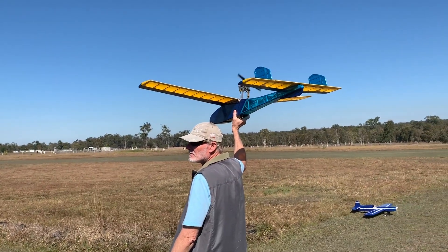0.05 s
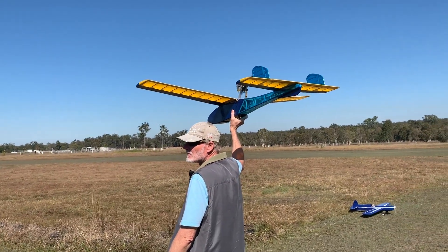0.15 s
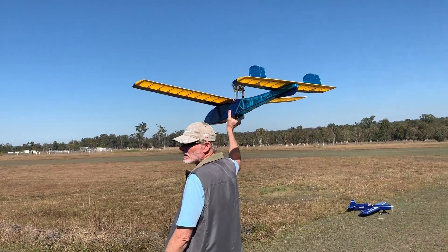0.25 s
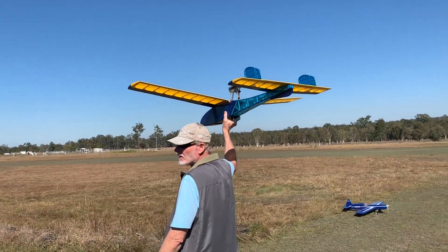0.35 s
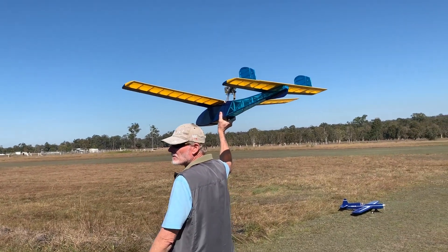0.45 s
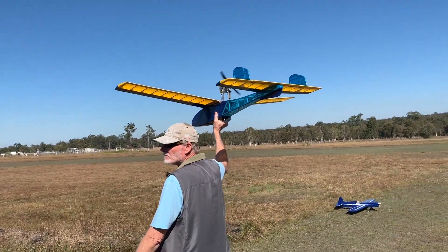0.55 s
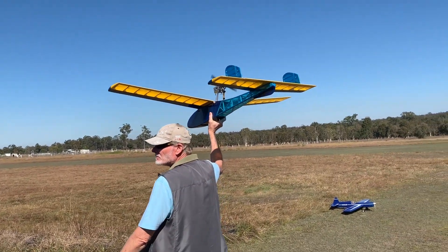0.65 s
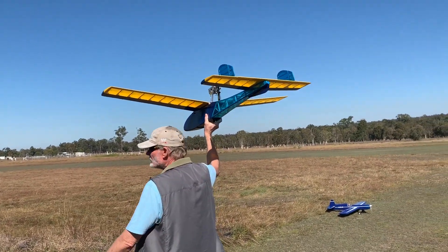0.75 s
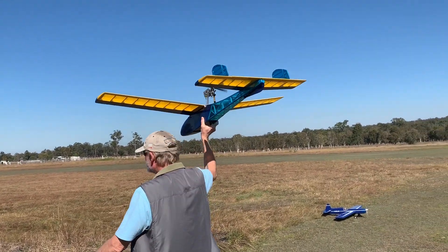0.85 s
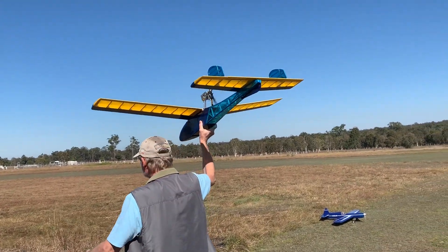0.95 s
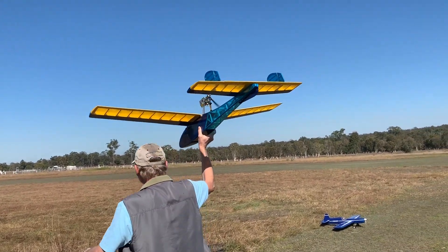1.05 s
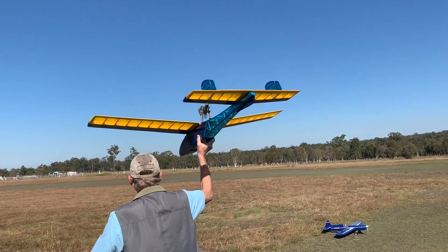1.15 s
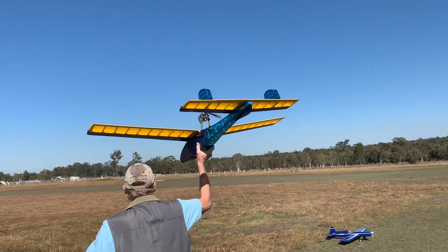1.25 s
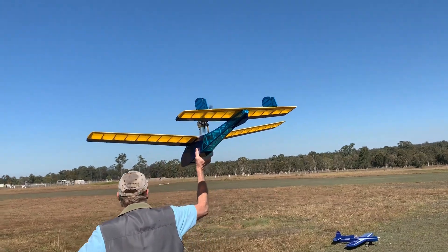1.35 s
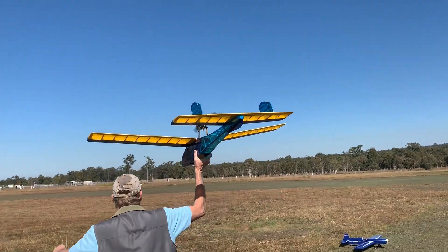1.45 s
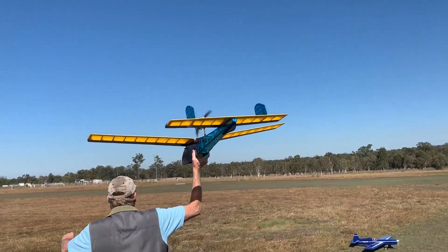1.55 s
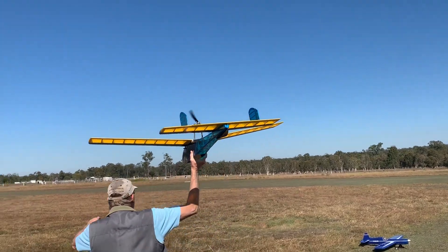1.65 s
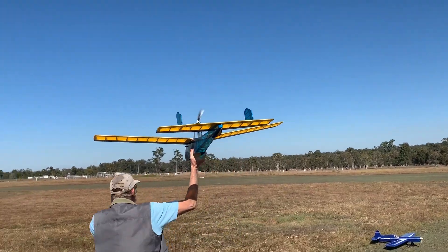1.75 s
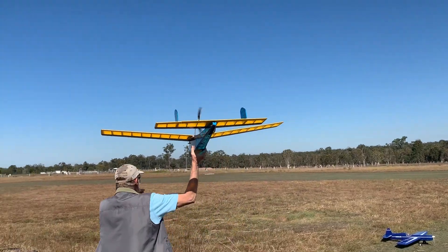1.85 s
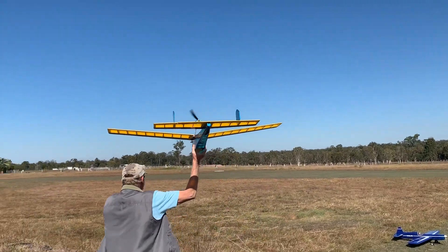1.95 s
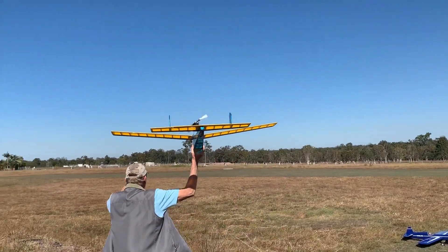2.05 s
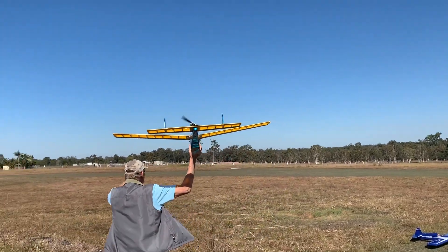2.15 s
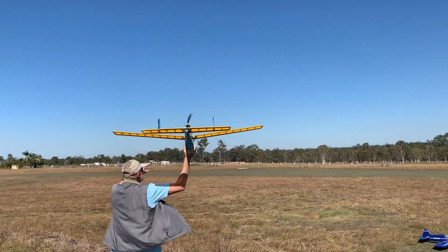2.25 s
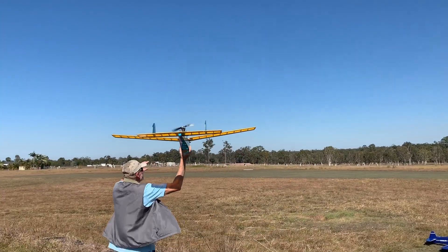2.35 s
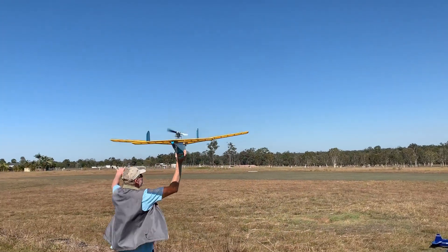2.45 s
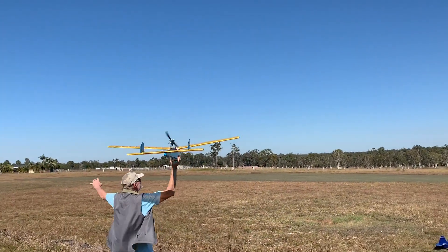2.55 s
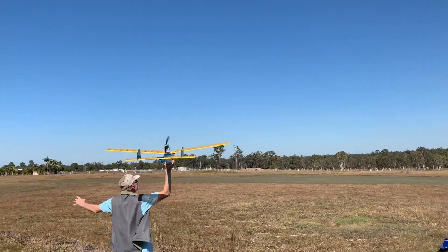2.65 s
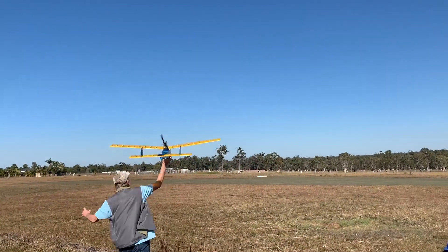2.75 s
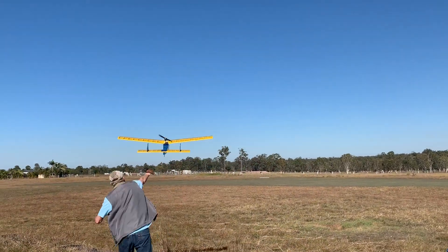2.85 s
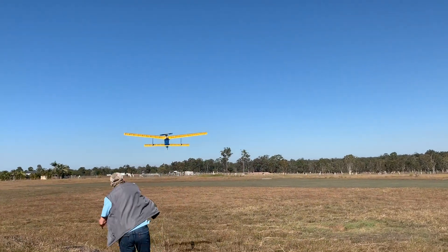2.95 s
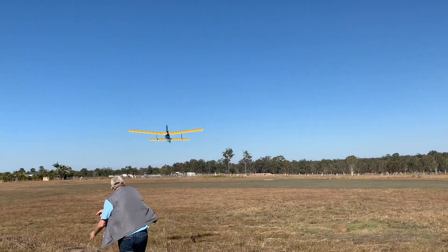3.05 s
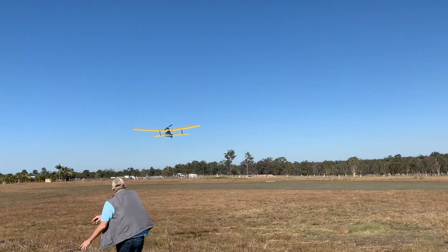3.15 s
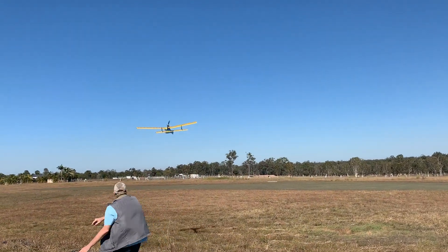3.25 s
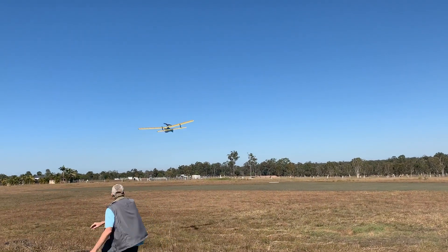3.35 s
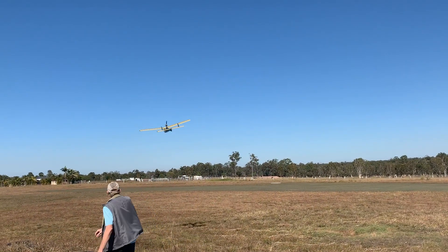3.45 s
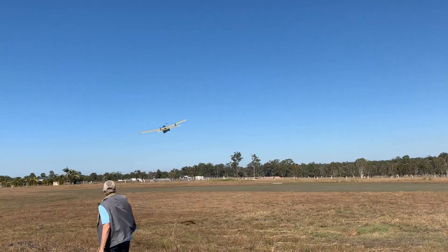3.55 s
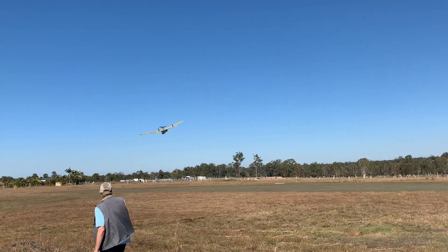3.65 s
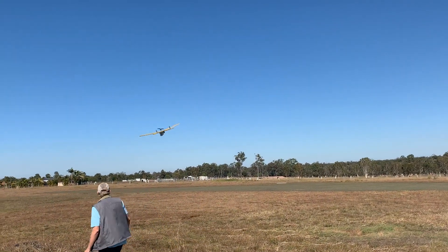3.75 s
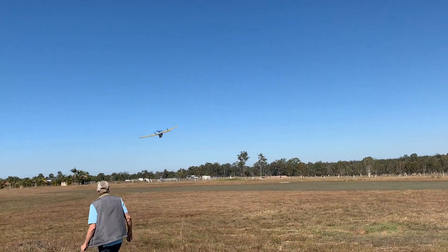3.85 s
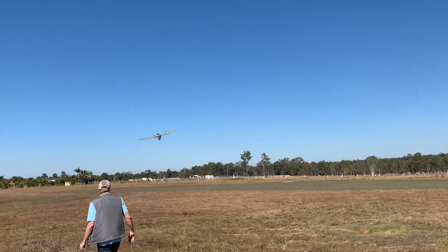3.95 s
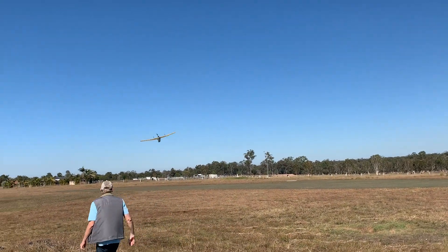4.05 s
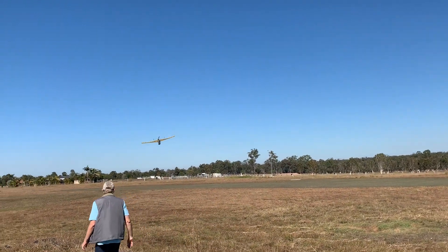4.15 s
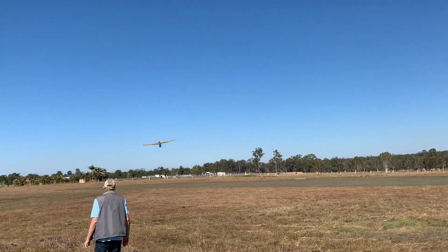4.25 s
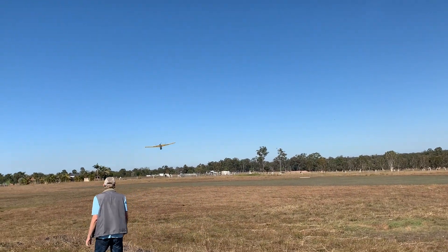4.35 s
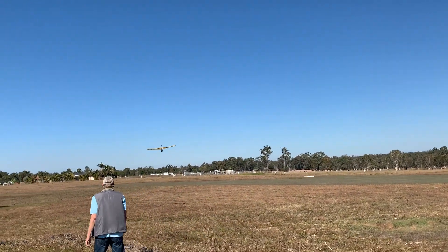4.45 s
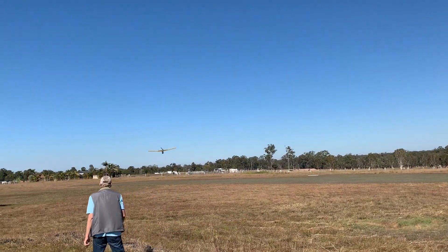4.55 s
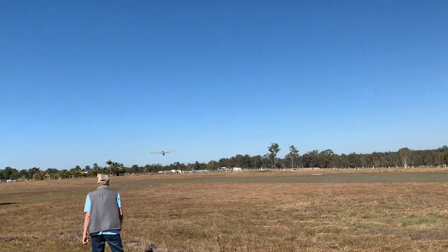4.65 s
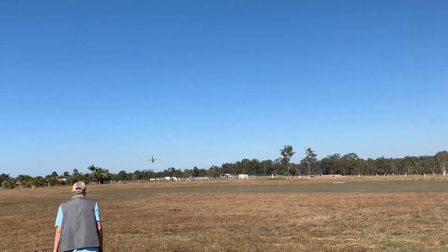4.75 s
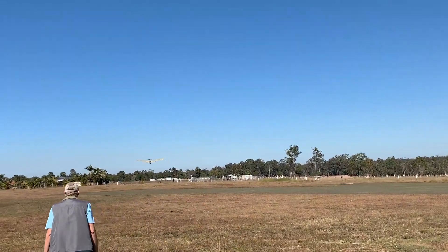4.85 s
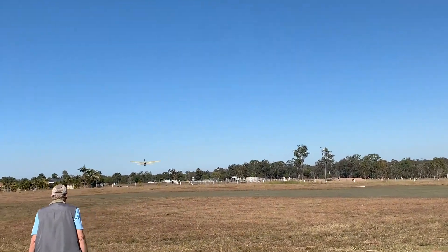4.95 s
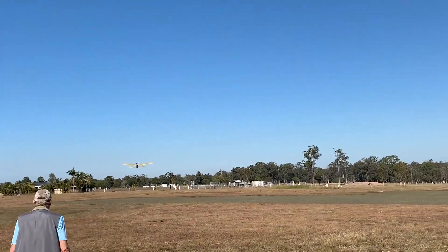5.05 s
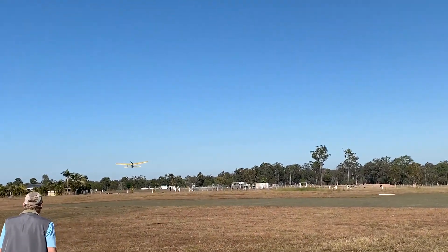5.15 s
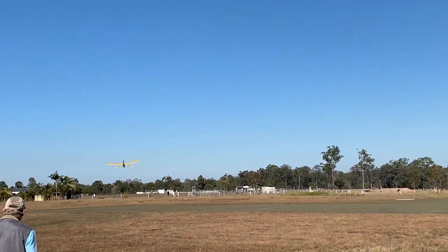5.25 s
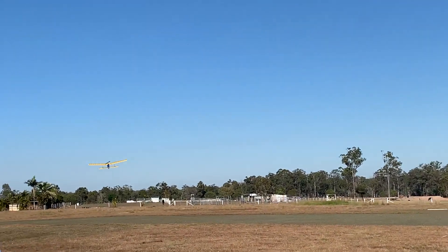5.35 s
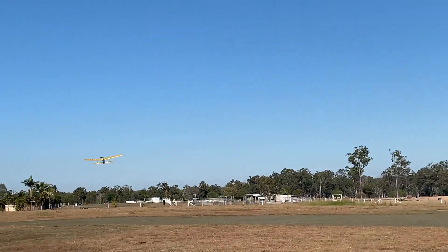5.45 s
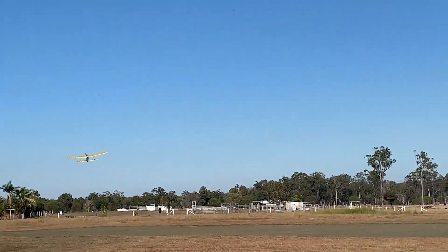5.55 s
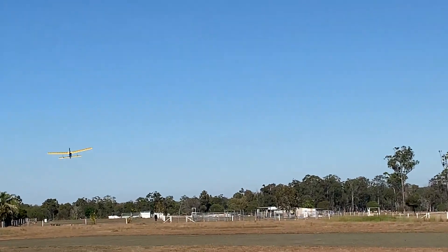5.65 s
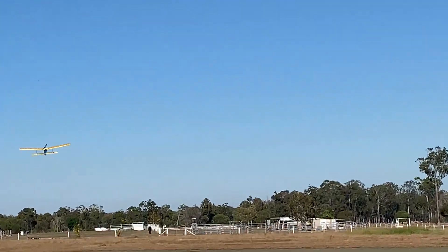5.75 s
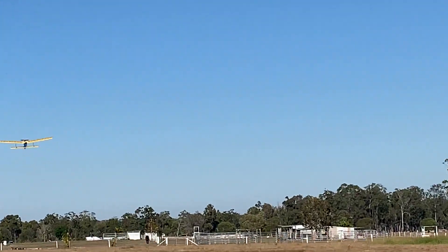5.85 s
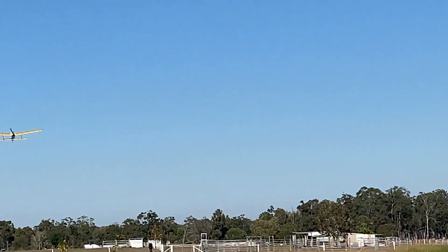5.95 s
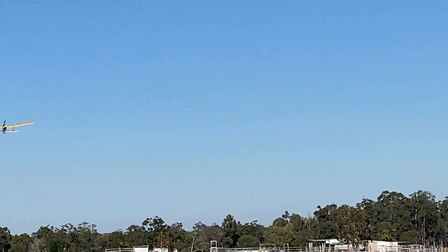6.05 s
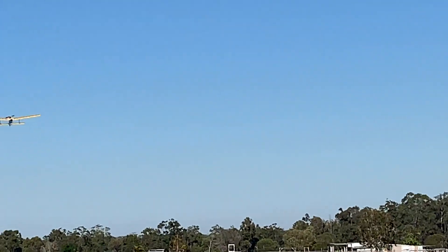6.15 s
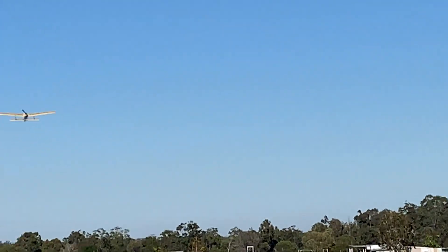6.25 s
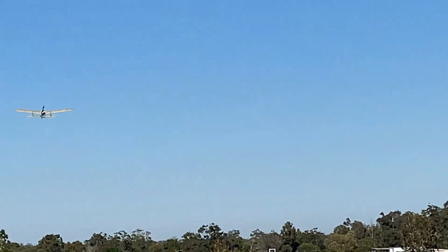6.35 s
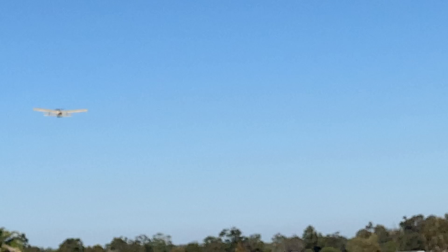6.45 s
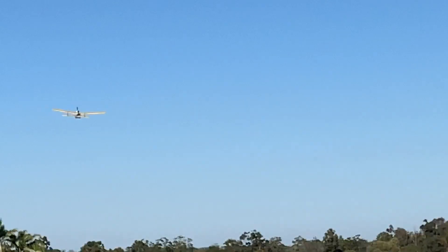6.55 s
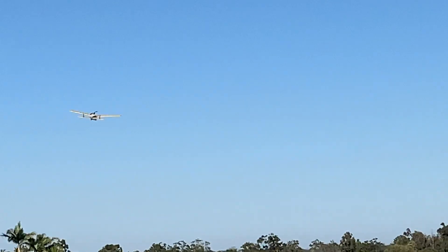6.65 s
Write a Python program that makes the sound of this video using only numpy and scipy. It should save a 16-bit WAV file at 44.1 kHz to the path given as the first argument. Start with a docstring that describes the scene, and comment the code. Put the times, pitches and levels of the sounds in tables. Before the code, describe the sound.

A small two-stroke model-plane engine revs up into a harsh close buzz, stumbles as it is thrown, then fades across an open field amid wind buffeting.

```python
"""Over open grass a small diesel two-stroke on a model plane revs up in a raised hand, sags as it is thrown and flies off.
Each firing is a pulse that rings the exhaust and the airframe; the propeller is a set of sines on multiples of
the shaft rate, and gas and blade tips hiss as coloured noise. The ground returns an echo whose lag follows the
flight. Gusts buffet a phone with two microphone ports as low noise and single slaps."""
import sys
import numpy as np
from scipy import signal
from scipy.fft import rfft, irfft, next_fast_len
from scipy.io import wavfile
from scipy.ndimage import uniform_filter1d, map_coordinates

SR = 44100
rng = np.random.default_rng(int(sys.argv[2]) if len(sys.argv) > 2 else 0)


def dump_mix(stems):
    """Bounce the given channels to the path in sys.argv[1] as a 16-bit WAV at rate SR."""
    frames = np.atleast_2d(stems).T  # one column per channel
    limited = np.clip(frames, -1, 1)  # hard clip at full scale
    pcm = np.round(limited * 32767).astype(np.int16)
    wavfile.write(sys.argv[1], SR, pcm)


N = 295911

THROW_S, SAG_S = 2.945, 0.105  # moment of the throw, length of the sag that leads up to it
SETTLE_S = 3.5  # after the throw the engine unloads and smooths out


def undb(db):
    """Level law: amplitude is ten to the power of dB / 20."""
    return 10 ** (np.asarray(db) / 20)


def unit(x):
    """Normalisation to a mean square of one."""
    return x / np.sqrt(np.mean(x ** 2))


def ramp(start_s, length_s):
    """Linear transition: 0 before start, 1 after start + length."""
    return np.clip((np.arange(N) / SR - start_s) / length_s, 0, 1)


def blend(share, a, b):
    """Linear interpolation from a to b."""
    return a + share * (b - a)


def play(table):
    """Linear interpolation in time of the columns of (s, ..) rows, one value per sample."""
    s, *columns = np.transpose(table)
    return [np.interp(np.arange(N) / SR, s, column) for column in columns]


def shape(x, gain):
    """Linear filtering: the spectrum times a complex gain, a function of Hz."""
    size = next_fast_len(N + SR // 4)
    f = np.arange(1, size // 2 + 2) * SR / size
    return irfft(rfft(x, size) * gain(f), size)[..., :N]


def noise(points):
    """Coloured Gaussian noise of rms 1, its relative density given by (Hz, dB per Hz) points."""
    hz, db = np.transpose(points)
    white = rng.standard_normal(N)
    return unit(shape(white, lambda f: undb(np.interp(np.log(f), np.log(hz), db))))


def walk(rate):
    """Slow random modulation of rms 1: levels held 1 / rate s and slewed twice."""
    hold = int(SR / rate)
    steps = np.repeat(rng.standard_normal(N // hold + 1), hold)
    return unit(uniform_filter1d(uniform_filter1d(steps, hold), hold)[:N])


def ring(x, modes):
    """Resonance: parallel second-order modes (Hz, width Hz, dB) of alternating sign."""
    def gain(f):
        return sum((-1) ** k * undb(db) * 1j * f * width / (hz ** 2 - f ** 2 + 1j * f * width)
                   for k, (hz, width, db) in enumerate(modes))
    return shape(x, gain)


def late(x, lag_ms):
    """Propagation delay: a moving lag shifts the pitch as a changing path does."""
    return map_coordinates(x, [np.arange(N) - lag_ms * SR / 1000], order=3)


def tones(turns, orders, waver_db):
    """Harmonic synthesis: wavering sines on multiples of the shaft rate, rms 1 at 0 dB."""
    return np.sqrt(2) * sum(undb(db + waver_db * walk(5.13)) * np.sin(2 * np.pi * k * turns + k ** 2)
                            for k, db in orders)


def field():
    """Diffuse background: independent steady noise at each port."""
    # Each row: frequency in Hz, relative density in dB per Hz.
    spectrum = [(100, 0), (300, -8), (1000, -20), (3000, -31), (8000, -36), (10000, -55), (15000, -75)]
    return undb(-56) * np.array([noise(spectrum), noise(spectrum)])


def slaps():
    """Transient pressure: single eddies strike as short damped swings."""
    # Each row: start in seconds, relative size in dB, nominal pitch in Hz.
    thumps = [(1.499, -8.5, 218.7), (1.617, -6.5, 222), (1.647, -5.5, 242), (1.709, -6, 93.75),
              (2.76, -13, 64.6), (2.888, -5.5, 82), (2.959, -9.5, 59.26), (3.299, -18.5, 40.6),
              (3.334, -10, 106.9), (3.411, -12, 53.5), (3.44, -19.5, 48.8), (3.542, -17, 51.3),
              (3.618, -7.5, 108), (3.768, -12, 59.6), (5.461, -22, 56.75), (5.531, -27, 40.4),
              (5.568, -15.5, 160), (5.699, -24, 51.5), (6.203, -14.5, 72), (6.309, -23, 40.54)]
    t, total = np.arange(N) / SR, np.zeros(N)
    for s, db, hz in thumps:
        cycles = np.clip((t - s) * hz, 0, 9)
        swing = np.sin(2 * np.pi * cycles ** 0.94)  # the pitch falls slightly
        total += undb(db) * swing * 4.25 * cycles * np.exp(-cycles / 0.27)
    return total


def wind():
    """Turbulent pressure: eddies hit both ports nearly alike as rumble, flutter on its crests, and slaps."""
    # Each row: time in seconds, rumble level in dB before buffeting.
    gusts = [(0, -46), (.61, -49), (1.05, -61), (1.16, -30), (1.22, -44), (1.38, -28.5), (1.6, -25.5),
             (2.3, -32), (2.7, -43), (2.76, -28.5), (2.97, -26.5), (3.03, -33.5), (3.26, -31.5),
             (3.32, -26.5), (3.46, -23), (3.5, -31.5), (3.61, -21.5), (3.67, -28.5), (3.76, -27.5),
             (3.84, -40.5), (3.98, -45.5), (4.2, -39.5), (4.5, -48), (5.16, -54), (5.4, -46), (5.47, -37),
             (5.52, -37), (5.58, -29), (5.63, -50), (5.7, -41), (5.77, -48), (6.12, -54), (6.22, -38),
             (6.52, -54.5), (6.71, -40)]
    # Rumble, then flutter. Each row: frequency in Hz, relative density in dB per Hz.
    rumble_colour = [(10, -19), (25, 2), (60, 3.5), (100, -0.5), (140, -3.5), (250, -58), (800, -110)]
    flutter_colour = [(60, -52), (110, -1), (170, 5.5), (260, 1.5), (400, -16), (650, -18), (1500, -100)]
    rumble_db = play(gusts)[0]
    flutter_db = -37.5 + 1.5 * (rumble_db + 29.5)  # flutter grows faster than rumble
    buffet = walk(30)

    def eddies():
        rumble = noise(rumble_colour)
        crest = unit(0.35 + np.abs(rumble))
        flutter = crest * noise(flutter_colour)
        return undb(rumble_db + 1.137 * buffet) * rumble + undb(flutter_db + 3.2 * buffet) * flutter

    common = eddies() + slaps()
    opposed = undb(-13.0) * eddies()  # opposite in sign at the two ports
    return common + opposed * np.array([[1], [-1]])


def scatter(x):
    """Diffuse scattering: bodies and tufts nearby return a short decaying blur, different at each port."""
    level_db, decay_ms = -11, 12
    t = np.arange(SR // 20) / SR
    blur = rng.standard_normal((2, len(t))) * np.exp(-t * 1000 / decay_ms)
    blur = blur / np.linalg.norm(blur, axis=1, keepdims=True)
    return undb(level_db) * signal.fftconvolve(x[None], blur, axes=1)[:, :N]


def ground_echo(direct):
    """Reflection: the path via the grass arrives late and dulled."""
    # Each row: time in seconds, lag in ms, level of the echo in dB re the direct sound.
    path = [(0, 5.72, -6), (.9, 5.45, -6), (1.5, 5.8, -10.5), (2.3, 5.08, -1), (2.7, 4.1, 3.5),
            (3.0, 3.56, 3.5), (4.0, 2.463, 1.5), (4.5, 1.78, -2.5), (4.95, 1.54, -1), (5.5, 1.19, -7.5),
            (6.0, 1.66, -1), (6.71, 1.71, 5.5)]
    grass_hz = 2740
    dulled = shape(direct, lambda f: 1 / np.sqrt(1 + (f / grass_hz) ** 2))  # grass swallows the treble
    lag_ms, echo_db = play(path)
    return undb(echo_db) * late(dulled, lag_ms)


def hiss(turns, hiss_db, dip_db):
    """Modulated jet noise: gas rushes out as the port opens, once a turn."""
    # Main hiss, then top hiss. Each row: frequency in Hz, relative density in dB per Hz.
    main_colour = [(1500, 0.5), (2600, 4), (3400, 0), (4200, 0.5), (4700, -2), (5300, 0), (5900, -0.5),
                   (6600, -1), (7200, -4), (8200, -1), (10000, -6), (11500, -74), (15000, -21)]
    top_colour = [(8500, -46), (10500, 1.5), (12500, 3.5), (14500, -3), (15600, -20)]
    # Each row: time in seconds, level of the top hiss in dB before the dip and the flicker.
    top_level = [(0, -47), (.5, -48), (.9, -40), (1.5, -46), (2.0, -40.5), (2.56, -46.5), (3.1, -54.5),
                 (3.74, -70), (4.07, -58.5), (4.67, -67), (5.2, -87), (6.2, -88), (6.63, -76)]
    top_db = play(top_level)[0] + dip_db
    puff = unit(0.5 + np.exp(-(turns % 1) / 1.64))
    main = undb(hiss_db + dip_db + 0.7 * walk(15)) * noise(main_colour)
    top = undb(top_db + 1.4 * walk(15)) * noise(top_colour)
    return puff * (main + top)


def propeller(turns, exhaust_db):
    """Rotating-blade harmonics: drone, chop on even multiples, and out-of-balance shake at the shaft rate."""
    # Each row: time in seconds, drone level in dB, shake level in dB.
    shaft = [(0, -69, -49), (.55, -43, -41), (.8, -22.5, -36), (1.0, -24, -27.5), (1.25, -21, -33.5),
             (1.5, -22.5, -32), (1.8, -22, -31.5), (2.1, -29, -37), (2.45, -34, -38.5), (2.8, -30.5, -36),
             (2.93, -46, -35), (3.1, -35, -41), (3.8, -62, -50.5), (4.6, -63, -54), (4.9, -58, -53.5),
             (6.71, -66, -60.5)]
    # Drone, then chop. Each row: multiple of the shaft rate, relative level in dB.
    drone_orders = [(2, 3), (3, -6), (4, -26.5)]
    chop_orders = [(4, -4.5), (6, 2.5), (8, 2.5), (10, 1.5), (12, -6.5), (14, -10.5), (16, -1.5),
                   (18, -2.5)]
    drone_db, shake_db = play(shaft)
    # the holder turns the tail to the listener, baring the blades: chop in dB re exhaust
    held_db = blend(ramp(1.51, 0.36), -35.5, -11)
    chop_db = blend(ramp(THROW_S, SETTLE_S), held_db, -7)
    drone = undb(drone_db) * tones(turns, drone_orders, 1.0)
    # two blades sweep past wing and pylon twice a turn
    chop = undb(exhaust_db + chop_db) * tones(turns, chop_orders, 4)
    shake = np.sqrt(2) * undb(shake_db) * np.sin(2 * np.pi * turns)
    return drone + chop + shake


def airframe(pulses):
    """Structural resonance: each firing rings the frame."""
    # Each row: frequency in Hz, width in Hz, relative level in dB.
    frame_modes = [(231, 34.6, 5), (362, 29.7, 2.5), (535, 190, -7.5)]
    # re the exhaust it shakes most while the engine runs up
    frame_db = 3 - 8.5 * ramp(0.61, 0.24) - 22 * ramp(1.9, 1.4)
    return undb(frame_db + 2.7 * walk(4.4)) * unit(ring(pulses, frame_modes))


def exhaust_crack(pulses, gas_db):
    """Source and filter: pulses and turbulence excite the resonances of the open exhaust."""
    # Low, main, upper and treble resonances. Each row: frequency in Hz, width in Hz, relative level in dB.
    low_modes = [(590, 600, -2.5), (633, 730, -1.5)]
    main_modes = [(996, 566, 12.5), (1560, 420, 3.5), (1620, 750, -3)]
    upper_modes = [(2110, 414, -8), (2515, 125, -7)]
    treble_modes = [(3560, 680, -14.5), (4260, 240, -19), (5170, 190, -4), (6300, 1650, -9.5)]
    # Each row: time in seconds, gain of the upper modes in dB before wavering, gain of the treble modes in dB.
    upper_level = [(0, 15, -5), (.8, 14.5, 7.5), (1.2, 16, -2), (1.8, 16.5, 3), (2.6, 15, 5),
                   (2.93, -5, -1), (3.3, 14, -2), (4.2, 7, 9), (4.8, 18.5, 8.5), (5.3, -7, 7.5),
                   (6.0, -29, 13.5), (6.71, 18, 9.5)]
    upper_db, treble_db = play(upper_level)
    gas = pulses + undb(gas_db) * pulses.std() * rng.standard_normal(N)
    low = undb(4.5 + 2 * walk(3.84)) * ring(gas, low_modes)
    upper = undb(upper_db + 2 * walk(3.783)) * ring(gas, upper_modes)
    treble = undb(treble_db) * ring(gas, treble_modes)
    crack = unit(ring(gas, main_modes) + low - upper - treble)
    return shape(crack, lambda f: 1 / (1 + (f / 5150.0) ** 6))  # the crack has little above this


def near_echoes(crack):
    """Early reflection: the wing, and until the throw the holder, return close copies."""
    # The holder's arm, head and shoulders. Each row: mean lag in ms, level in dB.
    holder = [(.9, -9), (2.6, -10), (4.1, -11)]
    sway_ms, sways_per_s = 0.45, 5
    crack = crack + undb(-10) * late(crack, 1.5 + 0.2 * walk(3))  # the wing rocks
    echoes = sum(undb(db) * late(crack, ms + sway_ms * walk(sways_per_s)) for ms, db in holder)
    return crack + (1 - ramp(THROW_S - SAG_S, SAG_S)) * echoes


def firings(turns, scatter_ms, scatter_db):
    """Jittered pulse train: one band-limited pulse a shaft turn, each a little early or late, weak or strong."""
    at = np.interp(np.arange(1, int(turns[-1])), turns, np.arange(N))
    nominal = at.astype(int)
    time_chance, size_chance = rng.standard_normal((2, len(at)))
    size = undb(scatter_db[nominal] * size_chance)
    at = at + scatter_ms[nominal] * time_chance * SR / 1000
    place = at.astype(int)[:, None] + np.arange(-7, 9)
    off = place - at[:, None]
    out = np.zeros(N + 16)
    np.add.at(out, place, size[:, None] * np.sinc(off) * np.cos(np.pi * off / 16) ** 2)  # windowed sinc
    return out[:N]


def starvation():
    """Relaxation: the throw starves the engine, which sags, stumbles and picks up again."""
    recover_s, recover_power = 0.115, 1.25
    after = np.maximum(np.arange(N) / SR - THROW_S, 0)
    return ramp(THROW_S - SAG_S, SAG_S) * np.exp(-(after / recover_s) ** recover_power)


def burning(starved):
    """Combustion variability: rms timing scatter (ms), size scatter (dB), turbulent share of the exhaust (dB)."""
    settled = ramp(THROW_S, SETTLE_S)

    def course(held, worst, flying):
        return blend(starved ** 2, blend(settled, held, flying), worst)

    return course(0.011, 0.3, 0.005), course(0.7, 2.5, 0.3), course(-17, -4, -25)


def plane():
    """Superposition: exhaust, airframe, propeller and hiss add, with the ground echo of exhaust and airframe."""
    # Each row: time in seconds, firing rate in Hz before the sag, exhaust level in dB and hiss level in dB
    # before the dips and the echoes.
    flight = [(0, 62.9, -30, -36), (.09, 64.5, -30, -38.5), (.35, 82.4, -26, -34.5),
              (.5, 89.95, -25, -34.5), (.73, 108, -24, -31), (.86, 116.2, -24, -29.5),
              (.97, 118.4, -23, -28), (1.25, 112, -25.5, -32), (1.44, 112.9, -24, -31.5),
              (1.76, 117.5, -24, -29.5), (2.09, 120.8, -28.5, -28), (2.56, 123.2, -31, -30.5),
              (2.78, 121.1, -31.5, -38), (3.3, 117.8, -36, -42.5), (3.74, 121.4, -38, -48),
              (4.07, 123.6, -40.5, -44.5), (4.67, 127.6, -40.5, -48.5), (5.4, 129.1, -45, -58),
              (5.98, 129.1, -45.5, -56.5), (6.71, 129.4, -49.5, -56.5)]
    hz, exhaust_db, hiss_db = play(flight)
    starved = starvation()
    # buzz and hiss drop for a moment as the arm whips forward
    drop_s, edge_s, hold_s = 2.85, 0.026, 0.064
    drop = ramp(drop_s, edge_s) - ramp(drop_s + edge_s + hold_s, edge_s)
    hz = hz - 32 * starved
    exhaust_db = exhaust_db - 4 * starved - 5 * drop
    scatter_ms, scatter_db, gas_db = burning(starved)
    turns = np.cumsum(hz) / SR
    pulses = firings(turns, scatter_ms, scatter_db) / np.sqrt(hz)  # power stays put as the rate climbs
    exhaust = near_echoes(exhaust_crack(pulses, gas_db))
    direct = undb(exhaust_db) * (exhaust + airframe(pulses))
    jerked = turns + scatter_ms * hz / 1000 * walk(60)  # uneven burning jerks the shaft
    return direct + ground_echo(direct) + hiss(turns, hiss_db, -7 * drop) + propeller(jerked, exhaust_db)


def at_ports(sound):
    """Diffraction: the phone's body delays and shades the sound differently on its way to each port."""
    # Each row: frequency in Hz, phase in radians by which left leads.
    port_phase = [(0, 0), (1810, 0.6), (2670, 2.2), (3450, 1.8), (4130, -0.2), (5170, 2.6), (5770, 3.0),
                  (6980, 0.2), (8180, -0.3), (9990, -3.1), (10900, -3.1), (13100, -6.2), (14800, -6.5),
                  (15200, -7.9)]
    # Each row: frequency in Hz, left minus right in dB.
    port_balance = [(60, -6), (200, -1), (700, -2), (1500, 0.5), (2500, -0.5), (3600, 4), (4400, 1),
                    (5200, -6), (6200, -6.5), (7000, 2), (8200, 0.5), (10000, -1), (15000, 1)]
    phase_hz, lead = np.transpose(port_phase)
    balance_hz, db = np.transpose(port_balance)

    def left_over_right(f):
        balance = undb(np.interp(np.log(f), np.log(balance_hz), db))
        return np.exp(1j * np.interp(f, phase_hz, lead)) * balance

    halves = np.array([[0.5], [-0.5]])  # each port takes half the difference
    return shape(sound, lambda f: left_over_right(f) ** halves)


def scene():
    """Superposition at the two ports of plane, scattered sound, wind and background."""
    sound = -plane()  # the ports read a pressure rise as a negative swing
    return field() + wind() + scatter(sound) + at_ports(sound)


def record(dry):
    """Band limiting: the phone cuts the top with a steep elliptic low-pass."""
    top_hz = 15676
    return signal.sosfilt(signal.ellip(12, 0.2, 70, top_hz, fs=SR, output="sos"), dry)


dry = scene()
out = record(dry)
dump_mix(out)
```